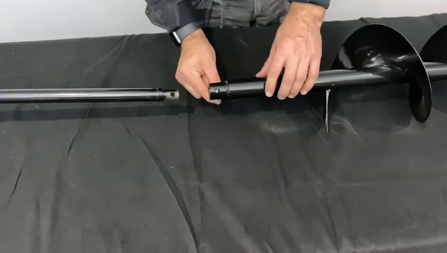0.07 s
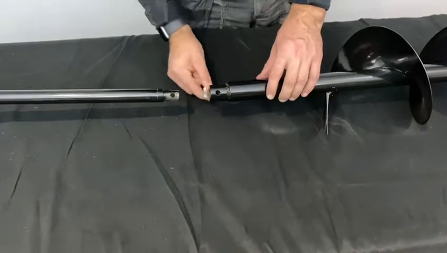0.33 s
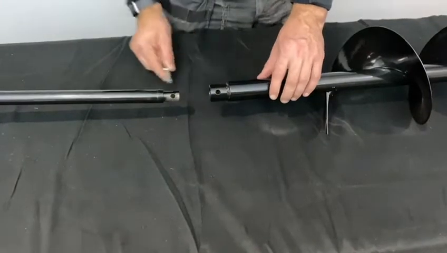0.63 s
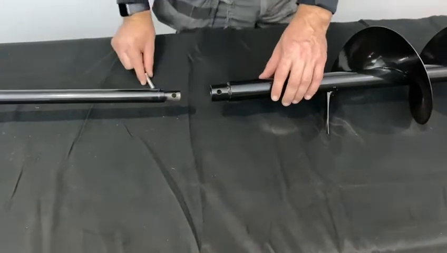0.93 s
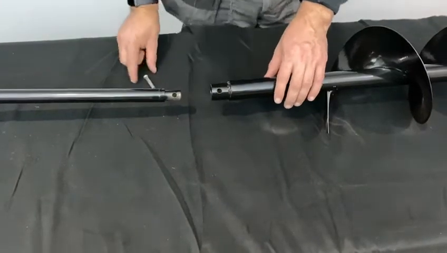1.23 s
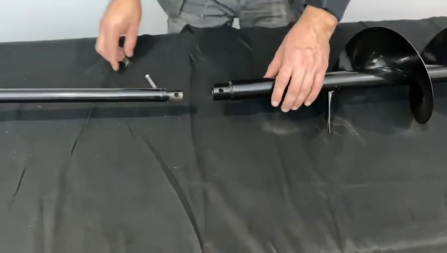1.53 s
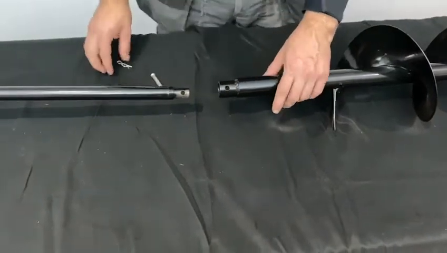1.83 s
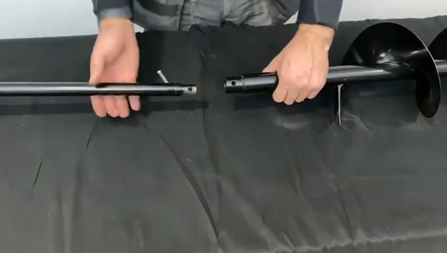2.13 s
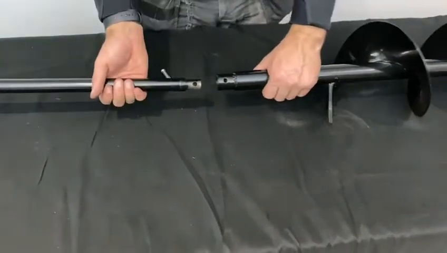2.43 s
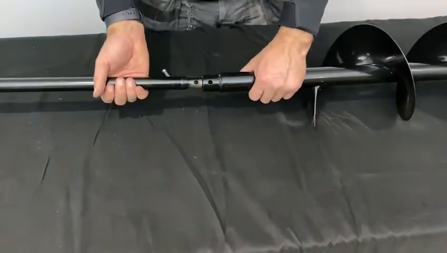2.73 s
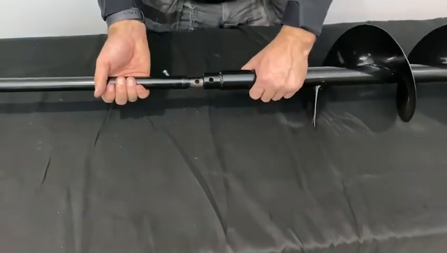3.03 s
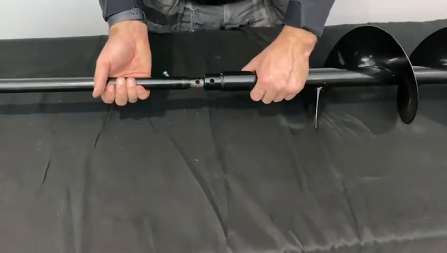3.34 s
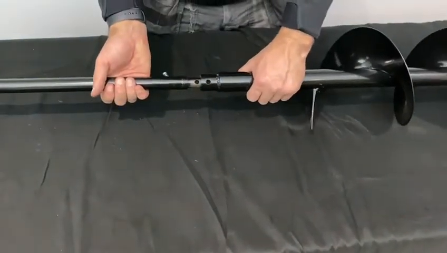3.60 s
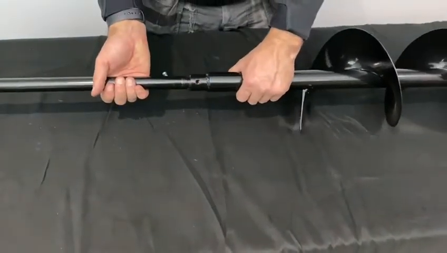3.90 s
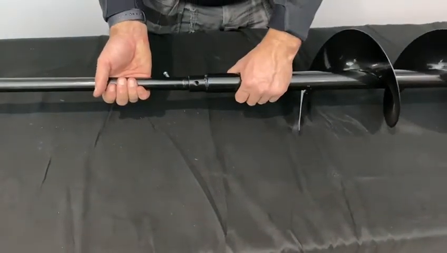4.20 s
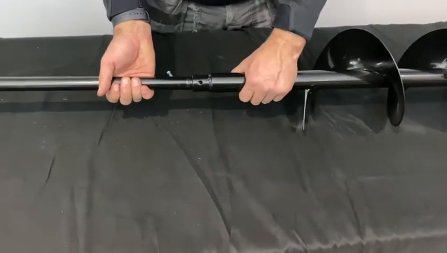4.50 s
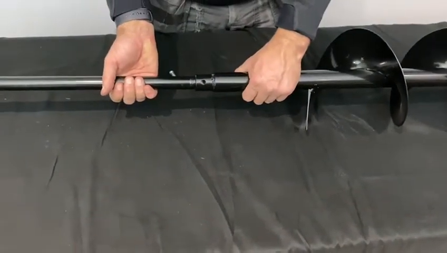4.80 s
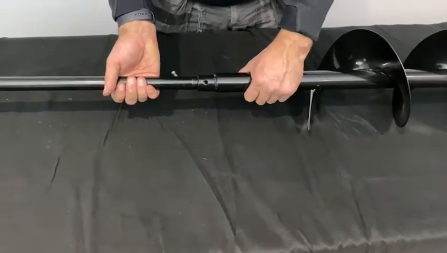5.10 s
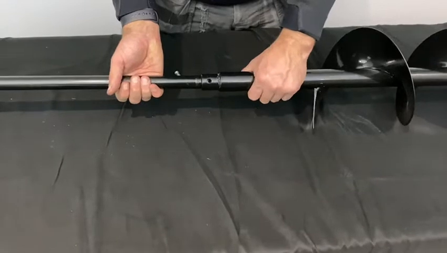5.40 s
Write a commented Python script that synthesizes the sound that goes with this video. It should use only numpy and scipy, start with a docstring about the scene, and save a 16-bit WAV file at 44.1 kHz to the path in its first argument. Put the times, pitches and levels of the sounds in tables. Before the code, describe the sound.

Steel parts are handled close by on a cloth-covered table in a small room with a low rumble. A short gritty scrape and a ringing clank come first, followed by soft table thumps and faint rubbing of hands. After a sharp pin clink, a shaft hisses briefly across the cloth, knocks on a metal collar, then clanks into place. Three duller knocks follow as it settles.

```python
"""Steel clanks and rings, a table thumps and sleeves rustle over the low rumble of a small room.
An earth auger and its steel extension shaft are being joined on a cloth-covered table. A locking pin
is pulled from the auger and put down. The shaft is lifted, slides over the cloth, knocks on the collar,
then drops into it and settles. Each struck part rings with its own set of fading tones."""
import sys
import numpy as np
from scipy import signal
from scipy.fft import rfft, irfft, next_fast_len
from scipy.io import wavfile

SR = 44100
rng = np.random.default_rng(int(sys.argv[2]) if len(sys.argv) > 2 else 0)


def persist_wave(psi):
    """Save psi, clipped to +-1, as 16-bit WAV."""
    counts = np.round(np.clip(psi, -1, 1) * 32767).astype(np.int16)
    wavfile.write(sys.argv[1], SR, np.atleast_2d(counts).T)


N = 244755
TIME = np.arange(N) / SR
AGE = TIME[:int(1.3 * SR)]   # seconds since a blow
BAND_EDGES_HZ = np.geomspace(25, 13000, 20)

# Tones of each steel part: pitch_hz, level_db, fade_s (a fade is the time to drop 60 dB)
AUGER = [(867, -20, .48), (1120, -23, .8), (1545, -10, .85), (1852, -15, .6), (1945, -5, .5),
         (2094, -15, .4), (2191, -10, .55), (2309, 4, .24), (2475, -8, .25), (2659, -14, .52),
         (2810, -12, .42), (3149, -7, .25), (3515, -11, .21), (3790, -10, .23), (3898, -13, .29),
         (4107, -3, .24), (4190, -6, .14), (5109, -20, .28), (5997, -13, .25), (6912, -15, .22),
         (7515, -9, .19), (9232, -16, .23), (9523, -19, .22), (10750, -19, .22)]
SHAFT = [(837, -9, 1.4), (1155, -15, 0.26), (1264, -16, 0.21), (1467, -10.5, .6), (1475, -10.5, 1),
         (1527, -10, 0.61), (1683, -7.5, .44), (1745, -10.5, 0.37), (1965, 2.5, .17), (2020, -17, 1),
         (2290, 1.5, .27), (2577, -6, 0.6), (2890, -4.5, 0.35), (3000, -12, 0.3), (3252, -10, .5),
         (3359, -13, .5), (3461, -2, .1), (3623, -6, .34), (3699, -4, .26), (4452, -7, .19),
         (4700, -13, .36), (5090, -8, .15), (5340, -14.5, 0.31), (6040, -26, .24), (6880, -20, .21),
         (7180, -17, .15)]
COLLAR = [(479, -19.5, .45), (853, 1, 0.39), (879, 5.5, 0.053), (953, -1.5, 0.17), (1310, -7, 0.33),
          (1432, 3.5, .1), (1458, 10, 0.12), (1444, -3.5, 0.33), (1760, -9, .32), (2350, 3.5, 0.26),
          (2678, -21.5, 0.5), (3660, -11, 0.21), (4720, -1, 0.15), (5340, 4, 0.029)]
PIN = [(439, 4, 0.13), (634, -14, 0.24), (2200, -17, .3), (2899, 1.5, 0.074), (3628, -31, 0.63),
       (3980, 11, 0.015), (4610, 1, 0.048), (6500, -26.5, .15)]
SEATED = [(517, -3.5, 0.25), (634, -6.5, 0.3), (828, 0.5, 0.45), (1418, -3.5, 0.25), (1570, -19, 0.25),
          (2300, -5, 0.16)]   # the shaft sitting in the collar
BLADE = [(550, -2.5, 0.42), (590, -1.5, 0.3), (659, -3, 0.46), (724.4, -12, 0.37)]
# How each part answers a blow: tones, gap_hz, clatter_db, crack_db, bass_db, fade_factor, pan_left_db
STEEL_PARTS = {"auger": (AUGER, 4750, 1.3, 4, -11.5, 1.18, 1.5),
               "blade": (BLADE, 4750, -9.5, -2, 1.5, .7, 2), "pin": (PIN, 3400, -11, 6.5, 0.45, 0.89, 2.7),
               "collar": (COLLAR, 3400, 3, 7.5, .5, .92, 4), "shaft": (SHAFT, 4050, 5, 13.9, 0, 1, 3.7),
               "seated": (SEATED, 3200, -0.71, -7, 4.7, 0.97, 3.6)}
# Steel parts knocking together or landing on the table: start_s, part, level_db, cutoff_hz
CLANKS = [(0.048, "auger", -43.5, 1550), (0.092, "auger", -33.5, 7500), (0.119, "blade", -38, 1035),
          (0.912, "pin", -80.5, 7500), (2.228, "pin", -60, 4200), (2.293, "pin", -36.5, 6940),
          (2.664, "collar", -30.5, 1850), (2.832, "collar", -62, 1500), (3.524, "shaft", -34.5, 6360),
          (3.721, "seated", -49, 1970), (3.845, "seated", -47.5, 1650), (4.125, "seated", -44.5, 996)]
# Blows that reach the table: start_s, boom_db, boom_hz, pat_db, cutoff_hz
THUDS = [(0.047, -41.5, 176, -41, 324), (0.096, -39.5, 97.2, -35, 247), (0.136, -48.5, 200, -42.5, 330),
         (0.913, -44, 137.8, -38.5, 274), (1.082, -36, 124, -38.5, 585), (1.6, -53, 144.6, -39.5, 615),
         (1.679, -63, 175, -54, 847), (2.126, -53, 135.5, -53, 250), (2.237, -44, 160, -49.5, 300),
         (2.297, -38.5, 160.1, -35, 527), (2.669, -46, 168, -40, 474), (3.034, -44.5, 131, -52, 280),
         (3.534, -31.5, 176.7, -43, 350), (3.725, -54.5, 177.4, -44, 560), (4.129, -38.5, 171.4, -35, 419)]
# Steel scraping on steel just before a clink, first the auger, then the pin: start_s, length_s, final_db,
# cutoff_hz
SCRAPES = [(0.05, .042, -44.5, 3000), (2.277, 0.018, -48.5, 8500)]
# Hands loosen the pin, carry it, let go, reach for the shaft, lift it, line it up, push it home
# and shift their grip: start_s, length_s, rub_db, rub_hz, rustle_db
HAND_MOVES = [(0, .1, -72.5, 400, -67), (0.63, 0.17, -64.5, 398, -76.5), (1.43, 0.042, -63, 390, -72),
              (1.656, 0.24, -69, 340, -72.5), (2.298, .2, -56, 130, -80.5), (2.57, 0.13, -63.5, 470, -76.5),
              (3.751, 0.21, -60, 145, -69), (5.35, 0.21, -72, 292, -84)]
# A crack bouncing off table and wall: delay_s, level_db
ECHOES = [(.0045, -13), (.0145, -12.5)]

# Noise colours, or how strong each pitch is: pitch_hz, level_db
ROOM_COLOUR = [(20, -27.5), (39, -12.5), (62, 2), (99, -6), (160, -13.5), (310, -17.5), (500, -25.5),
               (1000, -28.5), (1600, -37.5), (2500, -49), (5000, -50), (10500, -56.5), (12000, -76)]
RUSTLE_COLOUR = [(200, -18.5), (600, 1.5), (900, 2), (1450, -2), (2000, -6.5), (2800, -16), (6000, -26.5),
                 (11000, -31.5)]
SLIDE_COLOUR = [(410, -54.5), (700, -31), (1010, -19.5), (1880, -13), (2080, 0), (2730, -16.5), (3330, -17),
                (3750, -13.5), (3970, -26), (4580, -16), (7580, -17), (8420, -33), (9470, -15.5),
                (11600, -32), (15000, -64), (22000, -120)]
PAT_COLOUR = [(30, -10), (80, 1), (150, 6.5), (400, 0.5), (1000, -11.5), (4000, -12.5)]   # first instant of a blow on cloth
CRACK_COLOUR = [(100, -17), (500, -2), (1200, -7.5), (2500, 5.5), (4200, -4.5), (7000, -14), (10500, -13),
                (12000, -31)]   # first instant of a blow on steel
CLATTER_COLOUR = [(60, -5), (200, -3), (500, 0.5), (900, 2.5), (1200, -2.5), (2000, -0.5), (3200, -7),
                  (4500, -7), (6500, -11.5), (8500, -23), (10500, -26.5), (12000, -31)]   # the crowd of weak tones in steel and room
# Colour of a rubbing hand: pitch_multiple, level_db
RUB_COLOUR = [(.25, -14), (.75, -6), (1, 5.5), (1.25, -8), (3, -30), (8, -52)]
# How the clatter's noisy wash and thin shimmer die away, before stretching: pitch_hz, base_fade_s
WASH_FADES = [(100, .5), (1000, .4), (2500, .25), (5000, .17), (10000, .1)]
SHIMMER_FADES = [(2000, 0.34), (5000, 0.21), (10000, 0.14)]
# How alike the noise is in both ears: pitch_hz, likeness (1 is identical)
EAR_LIKENESS = [(60, 0.94), (200, 0.91), (600, 0.78), (2000, 0.28), (5000, 0.39), (8500, .93)]
# How far the left microphone's wave runs ahead of the right: pitch_hz, lead_radians
MIC_PHASE = [(50, 0), (700, .35), (3000, .5), (6000, .45), (7500, -1.0), (8400, -3.1), (9500, -5.4),
             (11000, -6.3)]


def from_db(db):
    """Turn decibels into a volume multiplier."""
    return 10 ** (np.asarray(db) / 20)


def at_hz(points, hz):
    """Read between a table's rows, with octaves evenly spaced."""
    pitches, values = np.transpose(points)
    return np.interp(np.log(np.maximum(hz, 1)), np.log(pitches), values)


def add(out, start_s, sound):
    """Mix a sound in at a given time."""
    at = max(round(start_s * SR), 0)
    out[:, at:at + sound.shape[-1]] += sound[..., :N - at]


def soften(hz, cutoff_hz):
    """A soft, long contact barely stirs the pitches above its cutoff."""
    return 1 / np.sqrt(1 + (hz / cutoff_hz) ** 4.5)


def noise_spectrum(colour, size):
    """Pitches and spectrum of coloured noise, partly alike in both ears."""
    hz = np.fft.rfftfreq(size, 1 / SR)
    mid, side = rfft(rng.standard_normal((2, size)))
    alike = at_hz(EAR_LIKENESS, hz)
    gain = from_db(at_hz(colour, hz)) * (hz < BAND_EDGES_HZ[-1])
    pair = np.sqrt((1 + alike) / 2) * mid + np.sqrt((1 - alike) / 2) * side * [[1], [-1]]
    return hz, pair * gain / np.sqrt(np.mean(gain ** 2))


def hiss(colour):
    """Steady coloured noise."""
    _, spectrum = noise_spectrum(colour, next_fast_len(N, True))
    return irfft(spectrum)[:, :N]


def flutter(per_s, depth_db):
    """A volume that wanders at random."""
    points = rng.standard_normal(4096)
    return from_db(depth_db * np.interp(TIME * per_s, np.arange(len(points)), points))


def stroke(start_s, length_s, rise_s, fade_s):
    """The volume of one movement: it swells, holds and dies away."""
    age = TIME - start_s
    return np.clip(age / rise_s, 0, 1) * from_db(-60 * np.clip((age - length_s) / fade_s, 0, 2))


def burst(colour, fades, cutoff_hz, bass_db=0, rise_s=0, gap_hz=None, sparse=False):
    """Countless weak tones blur into noise that dies band by band; the lows swell last."""
    age = AGE[:32768]
    hz, spectrum = noise_spectrum(colour, len(age))
    if sparse:   # keep only scattered high tones
        kept = rng.random(len(hz)) < 1 / 60
        spectrum *= kept / np.sqrt(kept.mean()) * (1 - soften(hz, 1100))
    if gap_hz:   # a dip where the part has few tones
        spectrum *= from_db(-18 * np.exp(-((hz - gap_hz) / 210) ** 2))
    spectrum *= soften(hz, cutoff_hz) * from_db(bass_db * soften(hz, 1200))
    out = 0
    for low, high in zip(BAND_EDGES_HZ, BAND_EDGES_HZ[1:]):
        centre_hz = np.sqrt(low * high)
        band = irfft(spectrum * ((hz >= low) & (hz < high)))
        swell = 1 - np.exp(-age / (rise_s + .7 / centre_hz))
        out += band * swell * from_db(-60 * age / at_hz(fades, centre_hz))
    return out


def room_rumble(level_db=-61.5):
    """The room at rest: a low, steady noise."""
    return from_db(level_db) * hiss(ROOM_COLOUR)


def hands_and_sleeves(rest_db=-80):
    """With each move, hands rub hollowly and sleeves rustle; sleeves never keep quite still."""
    rub, sleeve_gain = 0, from_db(rest_db)
    for start_s, length_s, rub_db, rub_hz, rustle_db in HAND_MOVES:
        move = stroke(start_s, length_s, rise_s=.06, fade_s=1)
        rub += from_db(rub_db) * move * hiss(np.array(RUB_COLOUR) * [rub_hz, 1])
        sleeve_gain = np.hypot(sleeve_gain, from_db(rustle_db) * move)
    rustle = sleeve_gain * hiss(RUSTLE_COLOUR) * flutter(per_s=110, depth_db=.1)
    return rub * flutter(per_s=32, depth_db=1.5) + rustle


def shaft_slide(start_s=2.28, length_s=.42, start_db=-70, rise_db_per_s=12):
    """The shaft hisses over the cloth, louder as it gathers speed."""
    level_db = start_db + rise_db_per_s * np.clip(TIME - start_s, 0, length_s)
    return from_db(level_db) * stroke(start_s, length_s, rise_s=.048, fade_s=.06) * hiss(SLIDE_COLOUR)


def table_thumps(boom_fade_s=.36, push_fade_s=.034, rebound_s=.022, board_hz=118.8):
    """A short push and a dull pat on the cloth, then the board booms at a pitch set by place and load."""
    out = np.zeros((2, N))
    for start_s, boom_db, boom_hz, pat_db, cutoff_hz in THUDS:
        boom_gain = (1 - np.exp(-AGE / .0049)) * from_db(boom_db - 60 * AGE / boom_fade_s)
        add(out, start_s, boom_gain * np.sin(2 * np.pi * boom_hz * AGE))
        push_gain = (1 - np.exp(-AGE / .0019)) * from_db(pat_db + 4.5 - 60 * AGE / push_fade_s)
        add(out, start_s, push_gain * np.sin(2 * np.pi * .69 * cutoff_hz * AGE))
        pat = from_db(pat_db) * burst(PAT_COLOUR, [(1, .18)], cutoff_hz)   # all pitches fade in .18 s
        add(out, start_s, pat)
        # Whatever lands touches once more, softly, and wakes a low tone of the board.
        add(out, start_s + rebound_s, from_db(-8) * pat)
        add(out, start_s + rebound_s, from_db(-7) * boom_gain * np.sin(2 * np.pi * board_hz * AGE))
    return out


def steel_scrapes(rise_db=11):
    """Steel drags on steel, harder and harder: a gritty noise that grows up to the clink."""
    out = 0
    for start_s, length_s, final_db, cutoff_hz in SCRAPES:
        hz, spectrum = noise_spectrum(CRACK_COLOUR, next_fast_len(N, True))
        grit = irfft(spectrum * soften(hz, cutoff_hz))[:, :N] * flutter(per_s=490, depth_db=2)
        level_db = final_db + rise_db * np.minimum((TIME - start_s) / length_s - 1, 0)
        out += grit * from_db(level_db) * stroke(start_s, length_s, rise_s=.002, fade_s=.065)
    return out


def singing_auger(pitch_hz=1848, level_db=-51, fade_s=1):
    """The auger is already ringing from the pin working loose."""
    return from_db(level_db - 60 * TIME / fade_s) * np.sin(2 * np.pi * pitch_hz * TIME)


def steel_ring(tones, cutoff_hz, rise_s=.0014):
    """A part's fading tones vary with where the blow lands and with the path to each ear."""
    out = 0
    chance = rng.standard_normal((len(tones), 3)) * [1, 1, .28]
    for (hz, level_db, fade_s), (extra_db, phase, ear_shift) in zip(tones, chance):
        wave = np.sin(2 * np.pi * (hz * AGE + phase) + ear_shift * np.array([[1], [-1]]))
        out += wave * soften(hz, cutoff_hz) * from_db(level_db + extra_db - 60 * AGE / fade_s)
    return out * (1 - np.exp(-AGE / rise_s))


def steel_clanks(shimmer_stretch=1.376, crack_fade_s=.021):
    """Each blow makes the part ring, stirs a clatter of weak tones and gives a sharp, echoing crack."""
    out = np.zeros((2, N))
    for start_s, part, level_db, cutoff_hz in CLANKS:
        tones, gap_hz, clatter_db, crack_db, bass_db, fade_factor, pan_left_db = STEEL_PARTS[part]
        ears = from_db(level_db) * from_db([[pan_left_db / 2], [-pan_left_db / 2]])
        add(out, start_s, ears * steel_ring(tones, cutoff_hz))
        wash_fades = np.array(WASH_FADES) * [1, fade_factor]
        shimmer_fades = np.array(SHIMMER_FADES) * [1, fade_factor * shimmer_stretch]
        blow = dict(cutoff_hz=cutoff_hz, bass_db=bass_db, rise_s=.0019, gap_hz=gap_hz)
        wash = from_db(-3) * burst(CLATTER_COLOUR, wash_fades, **blow)
        shimmer = from_db(-2.5) * burst(CLATTER_COLOUR, shimmer_fades, sparse=True, **blow)
        add(out, start_s, ears * from_db(clatter_db) * (wash + shimmer))
        crack = burst(CRACK_COLOUR, [(1, crack_fade_s)], cutoff_hz, rise_s=.00062)
        crack *= ears * from_db(crack_db)
        add(out, start_s, crack)
        for delay_s, echo_db in ECHOES:
            add(out, start_s + delay_s, from_db(echo_db) * crack)
    return out


def scene(grip_s=4.2, grip_db_per_s=120):
    """Mix all the sounds; once the parts are joined, a firm grip quiets the steel."""
    grip = from_db(-grip_db_per_s * np.maximum(TIME - grip_s, 0))
    steel = grip * steel_clanks() + steel_scrapes() + singing_auger()
    return steel + table_thumps() + hands_and_sleeves() + shaft_slide() + room_rumble()


def record(dry, cutoff_hz=11300):
    """The two microphone openings hear each wave slightly out of step; the top treble is cut steeply."""
    size = next_fast_len(N + SR, True)
    hz = np.fft.rfftfreq(size, 1 / SR)
    phase_shift = np.exp(.5j * at_hz(MIC_PHASE, hz) * np.array([[1], [-1]]))
    heard = irfft(rfft(dry, size) * phase_shift, size)[:, :N]
    treble_cut = signal.ellip(10, .1, 70, cutoff_hz, fs=SR, output="sos")
    return signal.sosfilt(treble_cut, heard)


dry = scene()
out = record(dry)
persist_wave(out)
```